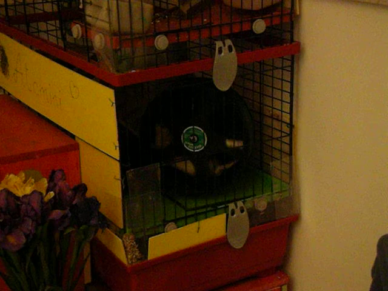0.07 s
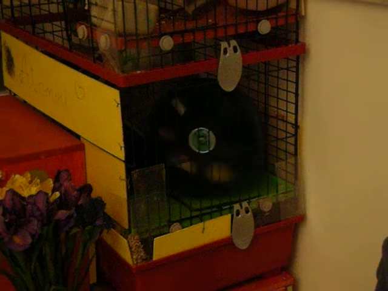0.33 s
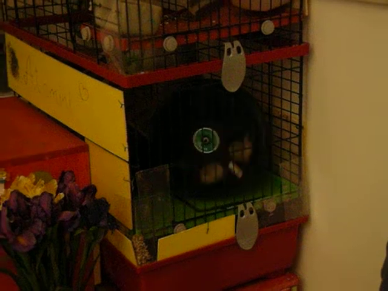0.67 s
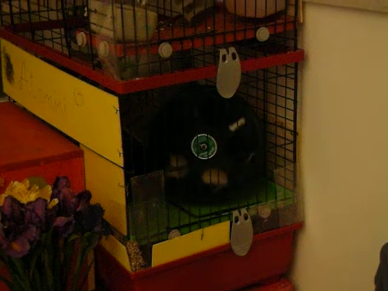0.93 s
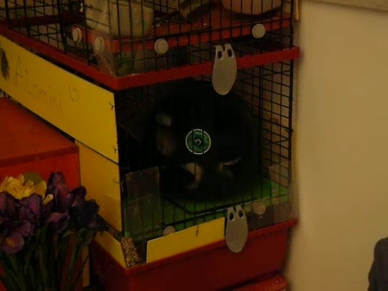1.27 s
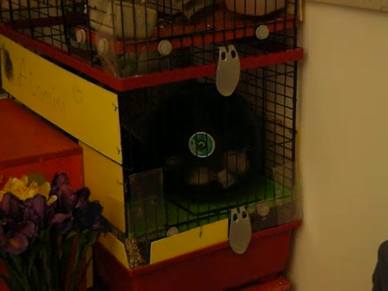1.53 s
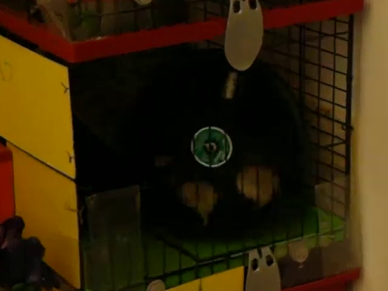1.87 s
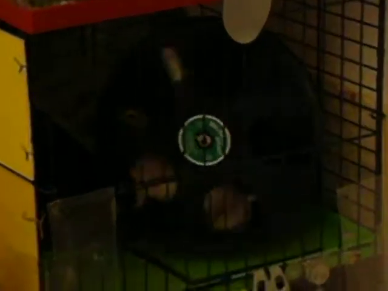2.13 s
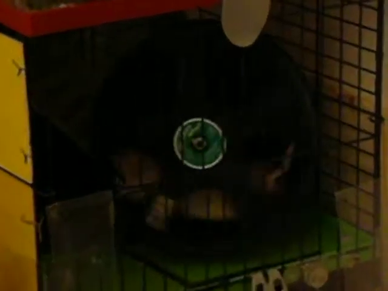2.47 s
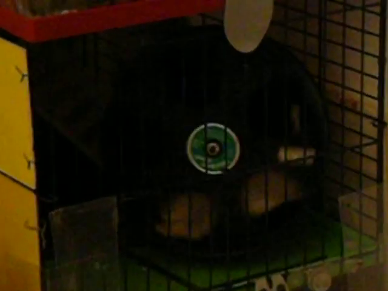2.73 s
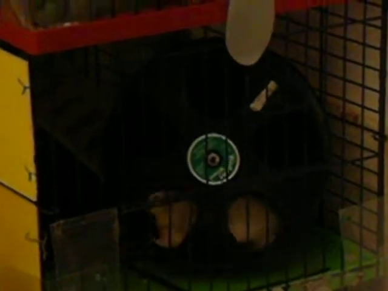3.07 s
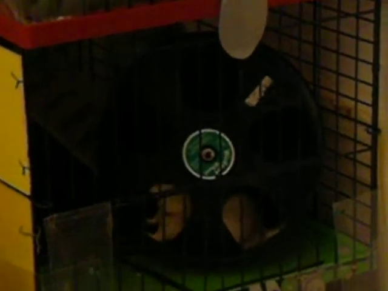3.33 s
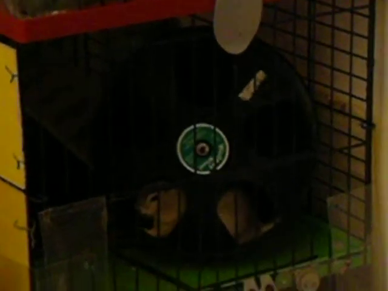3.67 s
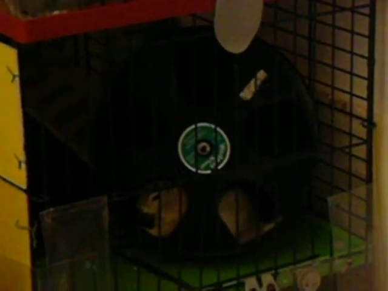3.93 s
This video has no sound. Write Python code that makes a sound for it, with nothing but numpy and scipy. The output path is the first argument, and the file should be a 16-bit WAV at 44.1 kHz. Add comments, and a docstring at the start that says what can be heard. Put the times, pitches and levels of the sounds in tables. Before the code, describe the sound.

A plastic exercise wheel rumbles on its axle from the start as a small rodent runs inside a wire cage. Short, uneven rattles come several times a second, with sharp ticks standing out around 1.3 and 1.8 seconds. The wheel weakens after 3 seconds and stops with light knocks by 3.5, leaving soft room hiss and faint hum. It sounds slightly muffled, about a metre away, with a short echo.

```python
"""A plastic exercise wheel turns in a wire cage as a small rodent runs in it, stopping after three seconds.
The axle rumbles in its bearing and makes the wheel and cage ring. The strides rock the loose wheel
into short rattles, with a few sharp ticks on top. The quiet room adds a short echo, soft hiss and hum.
A microphone about a metre away picks up little above four kilohertz."""
import sys
import numpy as np
from scipy import signal
from scipy.fft import rfft, irfft
from scipy.io import wavfile

SR = 44100
rng = np.random.default_rng(int(sys.argv[2]) if len(sys.argv) > 2 else 0)


def file_out(sig):
    """Save sig as 16-bit WAV at sys.argv[1]."""
    # one column per channel
    cols = np.atleast_2d(sig).T
    # limit, then scale
    lim = np.clip(cols, -1, 1)
    pcm = np.round(lim * 32767).astype(np.int16)
    wavfile.write(sys.argv[1], SR, pcm)


N = 176400
T = np.arange(N) / SR


def axle_rumble():
    """The axle grinds in its bearing: thousands of tiny bumps a second blur into a rumble."""
    # how loud the rumble is over time: t/s, level/dB
    loudness = [(.08, -20.5), (.24, -22), (.33, -24), (.48, -23.5), (.66, -24), (.77, -28), (.98, -26),
                (1.1, -29.5), (1.22, -27.5), (1.35, -26), (1.52, -23.5), (1.7, -25), (1.82, -28),
                (1.94, -26.5), (2.03, -27), (2.24, -22), (2.37, -26.5), (2.45, -34), (2.52, -35),
                (2.72, -26.5), (2.81, -31.5), (3.02, -29.5), (3.2, -30), (3.29, -38), (3.4, -38.5),
                (3.6, -49.5), (4, -53)]
    # tone of the grinding, from low to high: f/Hz, level/dB
    grind_tone = [(40, -44.5), (70, -14.5), (120, -3.5), (200, -2), (320, 2), (460, -5), (600, 2.5),
                  (1000, -0.5), (1500, -3), (2000, -5.5), (2900, -7.5), (3300, -14), (3700, -15.5),
                  (4400, -6)]
    grind = shape_tone(tiny_bumps(per_s=2500), grind_tone)
    bass = signal.sosfilt(signal.butter(1, 600, fs=SR, output="sos"), grind)
    treble = grind - bass
    tilt_db = 1.64 * wander(rate_hz=26)  # bass rises as treble falls, and back
    force = bass * from_db(tilt_db) + treble * from_db(-tilt_db)
    level_db = np.interp(T, *np.transpose(loudness)) + 1.64 * wander(rate_hz=35)
    return wheel_and_cage(force * from_db(level_db)) / rms(wheel_and_cage(grind))


def wheel_rattles():
    """The loose wheel rocks on its axle in bursts of bumps that start fast, hold, then fade."""
    # one row a rattle: t/s, cage thud/dB, drum knock/dB, rim clack/dB, scrape/dB, hold/s
    rattles = [(0.066, -31, -23.5, -27, -31.0, 0.066), (0.169, -33, -21.5, -24.5, -30.5, 0.066),
               (0.392, -32, -23, -24, -31.5, 0.023), (0.496, -41, -34, -25.0, -34.5, 0.047),
               (0.583, -28.5, -22.5, -21, -31.5, 0.05), (0.798, -37, -29, -26, -35, 0.01),
               (0.834, -38.5, -25.0, -21, -34, 0.031), (0.923, -33.5, -29, -31.5, -44, 0.05),
               (1.065, -43.5, -38, -32.5, -34.0, 0.012), (1.247, -38.5, -29, -38.5, -35.5, 0.0066),
               (1.29, -33.5, -26, -32, -34, 0.0097), (1.353, -27.5, -26.5, -25.5, -34.5, 0.019),
               (1.409, -29.5, -22, -24, -31.5, 0.034), (1.559, -37, -24.5, -21, -37, 0.014),
               (1.611, -36, -22.5, -32, -38, 0.015), (1.709, -29, -28, -30, -36, 0.015),
               (1.855, -43, -26.5, -25, -37.5, 0.022), (1.968, -30, -24.5, -30, -36, 0.074),
               (2.069, -38, -32, -24, -33, 0.018), (2.124, -39.5, -22.5, -24.5, -33.5, 0.036),
               (2.205, -36, -36, -35, -36, 0.013), (2.327, -41.5, -25, -46.5, -35, 0.016),
               (2.528, -41.5, -22, -27, -40.5, 0.029), (2.574, -42.5, -27.5, -21.5, -38, 0.022),
               (2.61, -30, -24, -27, -33.5, 0.035), (2.713, -36, -28, -52, -47.5, 0.017),
               (2.84, -35.5, -36, -31.5, -40.5, 0.036), (2.914, -31.5, -27, -26.5, -40.5, 0.031),
               (3.067, -30.5, -30.5, -31, -39.5, 0.032), (3.174, -34, -35.5, -45.5, -40, 0.025),
               (3.33, -36, -40, -32.5, -54, 0.018), (3.38, -39.5, -54, -40.5, -68, 0.025)]
    # thud, knock, clack and scrape: low f/Hz, high f/Hz, added level/dB, time to fade 60 dB/s, bump rate/Hz
    parts = [(138, 418, -1.5, 0.26, 1600), (504, 1022, -4.5, 0.24, 1900), (1080, 1935, -5, 0.25, 1400),
             (2000, 3800, -2, .13, 800)]
    rise_s, accent_s = 0.0022, 0.0018
    out = np.zeros(N)
    for part, (low_hz, high_hz, added_db, fade_s, per_s) in enumerate(parts):
        power = np.zeros(N)
        for start, *levels_db, hold_s in rattles:
            first = int(start * SR)
            age = T[:min(N - first, SR // 2)]
            shape = np.minimum(age / rise_s, 1) * fade(np.maximum(age - hold_s, 0), fade_s)
            accent_db = 2.5 * np.exp(-age / accent_s)  # a rattle starts harder than it goes on
            strength = shape * from_db(levels_db[part] + added_db + accent_db)
            power[first:first + len(age)] += strength ** 2
        band = signal.butter(3, [low_hz, high_hz], "band", fs=SR, output="sos")
        chatter = signal.sosfilt(band, tiny_bumps(per_s))
        out += np.sqrt(power) * chatter / rms(wheel_and_cage(chatter))
    return wheel_and_cage(out)


def plastic_ticks():
    """Hard plastic takes a single tap and rings for a few dozen vibrations at most."""
    # one row a tap: t/s, level/dB, f/Hz
    taps = [(0.363, -12.5, 3200), (0.395, -16, 1540), (0.8, -20.5, 1460), (1.064, -25.5, 3160),
            (1.3409, -9.5, 2840), (1.412, -17, 2450), (1.5589, -12.5, 1550), (1.8354, -8.5, 3020),
            (1.8649, -17.5, 1270), (2.0789, -16.5, 1660), (2.132, -17.5, 2380), (2.1406, -11.5, 1260),
            (2.257, -12, 3000), (2.527, -18.5, 2400), (2.535, -31, 875), (2.573, -21.5, 1890),
            (2.838, -24, 2520), (3.08, -23, 2500), (3.3334, -24, 1630)]
    # the tones in each tick: multiple of the tap's f, added level/dB, cycles to fade 60 dB
    tones = [(0.618, -19.5, 12), (0.822, -7.5, 16), (0.998, -4.5, 36), (1.202, -10, 32)]
    out, age = np.zeros(N), T[:SR // 20]
    for start, level_db, hz in taps:
        first = int(start * SR)
        for ratio, added_db, fade_cycles in tones:
            cycles = hz * ratio * age
            ring = np.sin(2 * np.pi * cycles) * fade(cycles, fade_cycles)
            out[first:first + len(age)] -= from_db(level_db + added_db) * ring
    return signal.sosfilt(signal.butter(2, 550, "high", fs=SR, output="sos"), out)


def wheel_and_cage(x):
    """When shaken, the wheel and cage ring at their own natural pitches."""
    # the pitches they ring at: f/Hz, boost/dB, width/Hz
    resonances = [(117.3, 9, 12), (165.4, 3.5, 5.5), (214, 8, 16), (254, 4.5, 7.4), (295.2, 7.5, 14),
                  (339, 7.5, 4), (397.6, 7, 43), (538, 8, 17), (582, 3, 20), (680, 6, 11), (710, 2, 17),
                  (831, 6, 9.9), (920, -0.5, 12), (980, 3.5, 13), (1025, 4, 22), (1200, 2, 22),
                  (1359, 6.5, 14), (1500, 4, 24), (1786, 2, 11), (2330, 4, 59), (3740, 3, 17),
                  (3743, 3.5, 60)]
    for hz, boost_db, width_hz in resonances:
        tuning = -2 * np.cos(2 * np.pi * hz / SR)
        width = np.pi * width_hz / SR
        boosted = width * from_db(boost_db)
        x = signal.lfilter([1 + boosted, tuning, 1 - boosted], [1 + width, tuning, 1 - width], x + 1e-18)
    return x


def room_echo(x):
    """Nearby walls throw the sound back as a short, smooth tail that begins 4 ms later."""
    age = T[:SR // 2]
    tail = rng.standard_normal(len(age)) * fade(age, 0.71) * (age > .004)
    return signal.fftconvolve(x, tail / np.sqrt(np.sum(tail ** 2)))[:N]


def room_noise():
    """The room has a soft hiss and a faint, slightly wavering hum."""
    # tone of the hiss: f/Hz, relative level/dB
    hiss_tone = [(40, -5.5), (90, -6), (140, -2.5), (400, -3.5), (700, -5.5), (1200, -9), (2200, -10.5),
                 (3800, -10.5)]
    # the tones in the hum: f/Hz, level/dB
    hum_tones = [(145, -63), (221, -60.5), (363, -58.5), (710, -61.5)]
    hiss = shape_tone(rng.standard_normal(N), hiss_tone)
    hiss = signal.sosfilt(signal.butter(4, 4900, fs=SR, output="sos"), hiss)
    hum = np.zeros(N)
    for hz, level_db in hum_tones:
        phase = 2 * np.pi * hz * T + 0.23 * wander(rate_hz=1)
        hum += from_db(level_db) * np.sqrt(2) * np.sin(phase)
    return from_db(-49.5) * hiss / rms(hiss) + hum


def from_db(db):
    """Turn decibels into a number to multiply by."""
    return 10 ** (np.asarray(db) / 20)


def rms(x):
    """The typical size of a signal (root mean square)."""
    return np.sqrt(np.mean(x ** 2) + 1e-20)


def fade(age, length):
    """Die away to a thousandth (60 dB down) by the time age reaches length."""
    return np.exp(-np.log(1000) * age / length)


def wander(rate_hz):
    """A smooth random wobble of typical size 1; a higher rate makes it quicker."""
    step, warm_up = 40, 2000  # one point every 40 samples; the first 2000 points are dropped
    memory = np.exp(-2 * np.pi * rate_hz * step / SR)
    noise = rng.standard_normal(N // step + warm_up + 2)
    slow = signal.lfilter([1], [1, -2 * memory, memory * memory], noise)[warm_up:]
    return np.interp(np.arange(N) / step, np.arange(len(slow)), slow / rms(slow))


def tiny_bumps(per_s):
    """Clicks at random moments, up to 4 dB apart in strength, scaled to an rms of 1."""
    sizes = from_db(np.minimum(rng.exponential(1, N), 4)) * rng.choice([-1, 1], N)
    clicks = sizes * (rng.random(N) < per_s / SR)
    return clicks / rms(clicks)


def shape_tone(x, points):
    """Turn low and high pitches up or down along a curve of (f/Hz, level/dB) points."""
    hz, db = np.transpose(points)
    size = 2 * N
    freqs = np.maximum(np.arange(N + 1) * SR / size, 1)
    gain = from_db(np.interp(np.log(freqs), np.log(hz), db))
    cepstrum = irfft(np.log(gain))
    cepstrum[1:N] *= 2  # using only this half, doubled, makes the filter ring after a click, never before
    response = np.exp(rfft(cepstrum[:N], size))
    return irfft(rfft(x, size) * response)[:N]


def scene():
    """The running wheel, its echo and the quiet room around it."""
    wheel = axle_rumble() + wheel_rattles() + plastic_ticks()
    return (wheel + from_db(-13) * room_echo(wheel) + room_noise())[None]


def record(dry):
    """The microphone switches on just after the start, sits a little below zero and loses the high treble."""
    switch_on_s, offset = .072, -.057
    rolloff_hz, cutoff_hz = 3786, 4900
    picked_up = (dry + offset) * (T >= switch_on_s)
    dulled = signal.sosfilt(signal.butter(14, rolloff_hz, fs=SR, output="sos"), picked_up)
    return signal.sosfilt(signal.cheby2(14, 70, cutoff_hz, fs=SR, output="sos"), dulled)


dry = scene()
out = record(dry)
file_out(out)
```